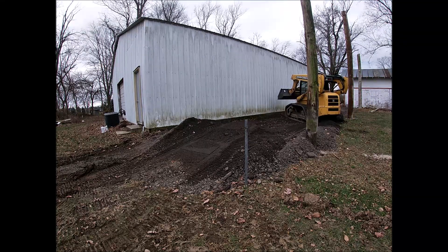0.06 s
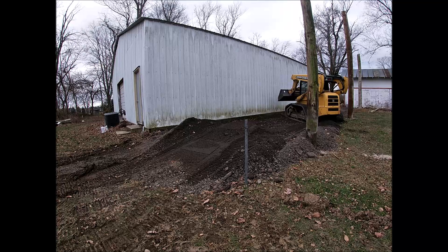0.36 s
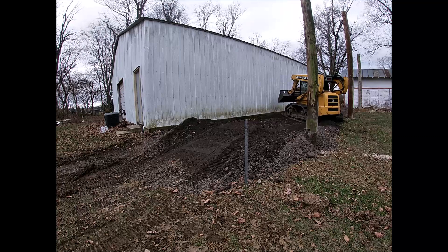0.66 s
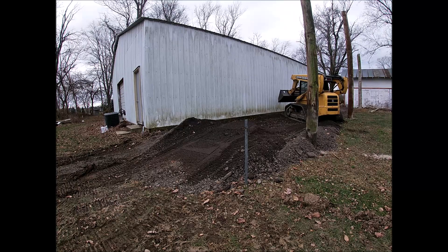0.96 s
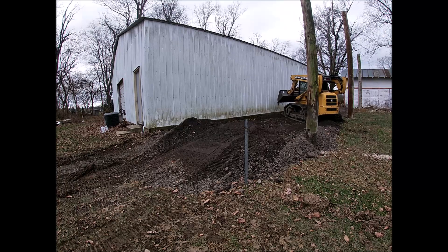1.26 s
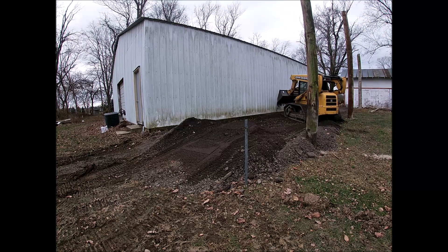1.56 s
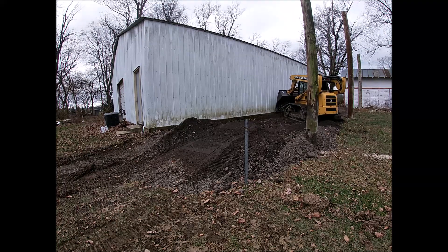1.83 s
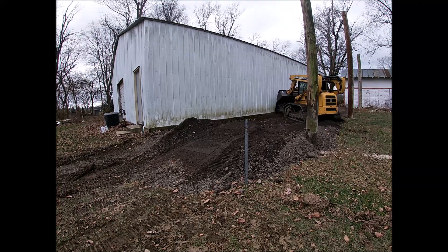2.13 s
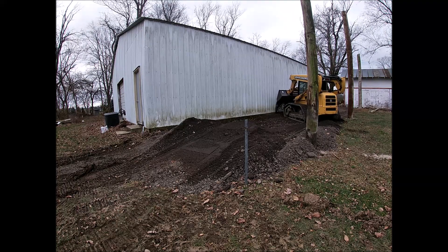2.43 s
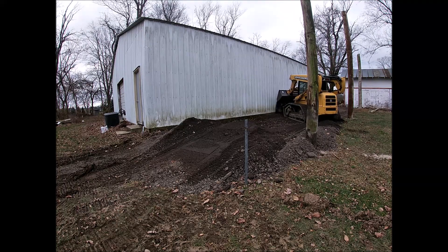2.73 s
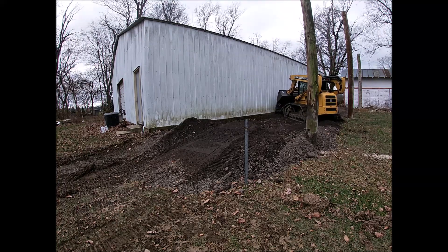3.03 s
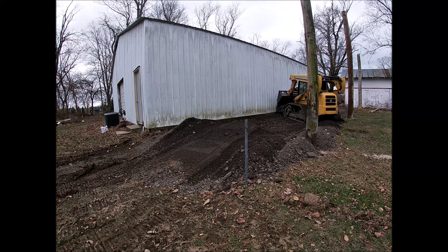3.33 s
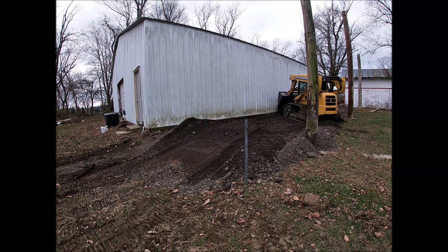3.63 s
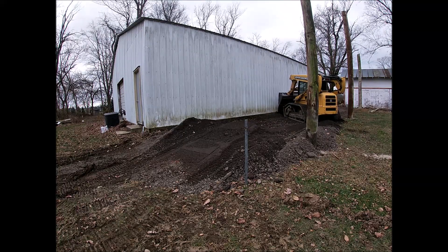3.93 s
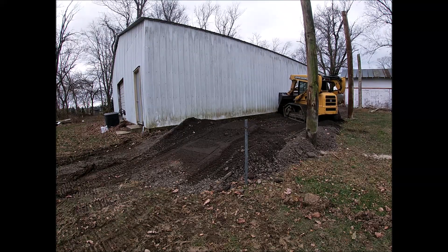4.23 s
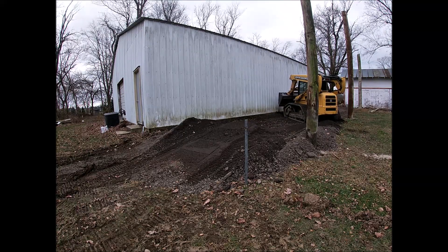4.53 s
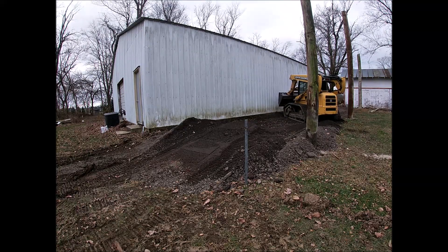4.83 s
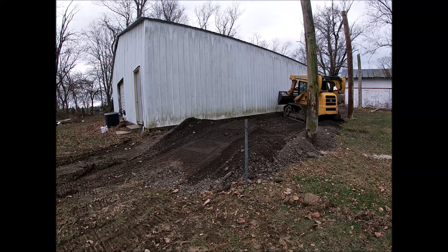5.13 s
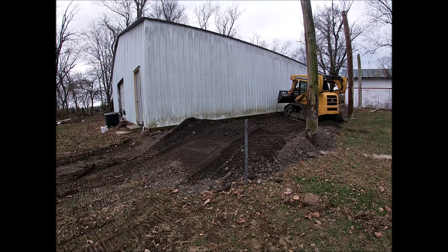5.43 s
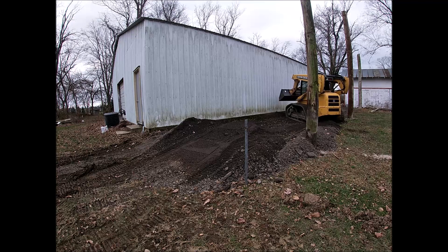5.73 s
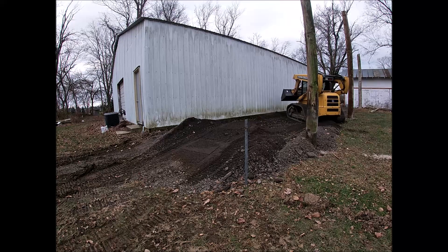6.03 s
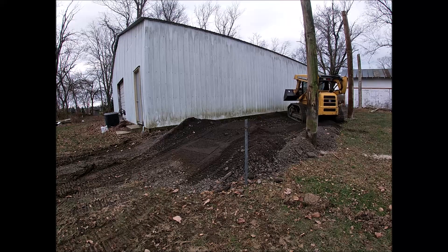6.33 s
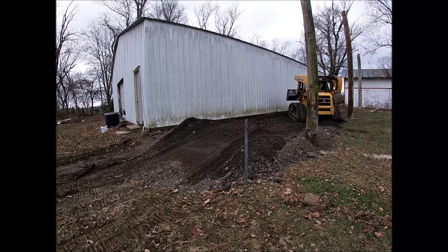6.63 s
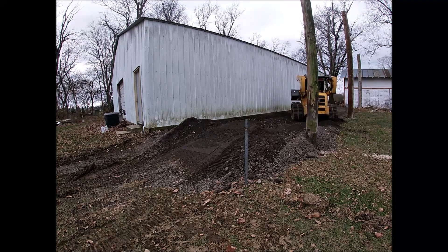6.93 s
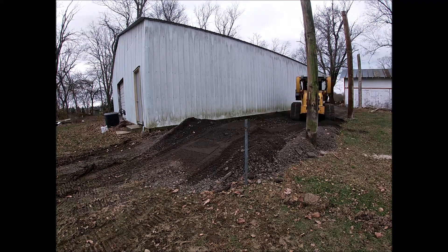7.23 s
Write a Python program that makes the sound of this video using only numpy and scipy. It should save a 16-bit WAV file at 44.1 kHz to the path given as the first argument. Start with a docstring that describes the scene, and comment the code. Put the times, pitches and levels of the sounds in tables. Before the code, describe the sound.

A tracked skid steer works outdoors some way off, its diesel engine droning throughout with fast knocking, metallic clatter and a rush of fan air. Beneath it the tracks grind over grit, while faint valve whistles come and go. Just after 1 second the engine dips briefly as the hydraulic pump whines. At about 1.7 seconds the bucket drops with one dull, short clunk. Softer whines and a faint crunch of small stones follow around 2 to 3 seconds. Wind rumbles and thumps on the microphone from about 1 second, strongest between 3 and 5.5 seconds, with another short gust near 7 seconds. From about 5 seconds the engine sags slightly in pitch and turns rougher, recovers briefly at 6 seconds, then sags again. The hydraulic whine and track grinding peak between 6 and 6.5 seconds, and the engine is still labouring at the end, around 7.4 seconds.

```python
"""Skid steer working a pile of millings

Some way off, beside a metal barn, a four-cylinder diesel drones, knocks and clatters.
It sags when the hydraulic pump takes load and whines; valves whistle and drive motors moan.
The tracks grind through the grit, the bucket clunks down once, and wind buffets the microphone."""
import sys
import numpy as np
from scipy import signal
from scipy.fft import rfft, irfft, next_fast_len
from scipy.io import wavfile
from scipy.ndimage import uniform_filter1d, minimum_filter1d, map_coordinates

SR = 44100
rng = np.random.default_rng(int(sys.argv[2]) if len(sys.argv) > 2 else 0)


def wav_record(signal):
    """Record a signal, one row per channel, as 16-bit PCM in the file named by sys.argv[1]."""
    frames = np.transpose(np.atleast_2d(signal))
    bounded = np.clip(frames, -1, 1)
    # unit amplitude maps onto the largest positive 16-bit level
    quanta = np.round(bounded * 32767).astype(np.int16)
    wavfile.write(sys.argv[1], SR, quanta)


N = 325458
TIME = np.arange(N) / SR

# Engine speed. Each row: time in seconds, firings per second.
FIRING_RATE = [(0.0, 60.57), (0.93, 60.93), (1.21, 59.36), (1.58, 61.44), (1.93, 60.23), (2.53, 61.46),
               (2.94, 60.9), (3.69, 60.8), (4.61, 61.3), (5.0, 60.8), (5.15, 58.45), (5.31, 58.82),
               (5.61, 56.84), (6.06, 60.03), (6.39, 56.94), (6.74, 56.11), (7.04, 57.05), (7.38, 56.68)]
# The engine bay as the machine turns and tilts. Each row: time in seconds, clatter in dB, air in dB.
ENGINE_BAY = [(0, -44.5, -46.5), (1.2, -42, -47), (1.85, -45, -48), (2.25, -40, -46), (3.5, -39.5, -46.5),
              (4.1, -39, -44.5), (4.7, -46, -47), (5.2, -39.5, -43.5), (5.85, -40, -45), (6.15, -44.5, -45),
              (6.75, -48.5, -49), (7.2, -42, -53)]


def amp(db):
    """Decibels to gain."""
    return 10 ** (np.asarray(db) / 20)


def unit(x):
    """Scales to rms 1."""
    return x / np.sqrt(np.mean(x ** 2) + 1e-20)


def curve(table, column):
    """One column of a timed table at every sample."""
    rows = np.array(table, float)
    return np.interp(TIME, rows[:, 0], rows[:, column])


def bump(s, rise_s, fall_s):
    """Gain that rises smoothly to 1 at time s and falls again."""
    width_s = np.where(TIME < s, rise_s, fall_s)
    return np.exp(-np.minimum(((TIME - s) / width_s) ** 2, 20))


def swells(table, rest_db):
    """Gain of events that rise and fall over a resting level."""
    power = sum((amp(db) * bump(s, rise_s, fall_s)) ** 2 for s, db, rise_s, fall_s in table)
    return np.sqrt(amp(rest_db) ** 2 + power)


def colour(x, spectrum):
    """Shapes x with an EQ curve; the result has rms 1."""
    hz, db = np.transpose(spectrum)
    size = next_fast_len(len(x))
    bins = np.fft.rfftfreq(size, 1 / SR)
    gain = amp(np.interp(np.log(bins + 1), np.log(hz), db))
    return unit(irfft(rfft(x, size) * gain, size)[:len(x)])


def drift(rate):
    """Smooth random motion of rms 1 that changes about rate times a second."""
    knots = rng.standard_normal(4096)
    return unit(map_coordinates(knots, [TIME * rate], order=2, mode="wrap"))


def tone(turns, flutter_db, wander):
    """A sine of rms 1 that flutters in level and wanders in phase."""
    return unit(amp(flutter_db * drift(18)) * np.sin(2 * np.pi * (turns + wander * drift(13))))


def narrow(hz, half_width_hz):
    """A narrow band of noise with rms 1."""
    lowpass = signal.butter(2, half_width_hz, fs=SR, output="sos")
    slow = signal.sosfilt(lowpass, rng.standard_normal((2, N)))
    phase = 2 * np.pi * np.cumsum(np.full(N, hz)) / SR
    return unit(slow[0] * np.cos(phase) + slow[1] * np.sin(phase))


def strokes(cycles, place, jitter_s, spread_db):
    """One click each time the crank passes a place in its cycle, a little uneven in time and force."""
    late, force = rng.standard_normal((2, 128))
    due_s = np.interp(np.arange(len(late)) + place, cycles, TIME, right=-1)
    at = (due_s + jitter_s * late) * SR
    inside = (at > 0) & (at < N - 1)
    return np.bincount(at[inside].astype(int), amp(spread_db * force[inside]), N)


def ring(clicks, response):
    """Lets every click sound the response."""
    return signal.oaconvolve(clicks, response)[:N]


def exhaust(cycles):
    """The firing tone, its octave lifted by the muffler, and the throb of unequal cylinders."""
    # The drone, weaker up on the pile. Each row: time in seconds, firing tone in dB, octave in dB.
    levels = [(0, -27.3, -22), (.85, -28.3, -21.7), (1.25, -32.5, -21), (1.65, -27, -22.5),
              (1.95, -41, -26), (2.2, -33.5, -25.5), (3.1, -34, -25), (3.6, -29.5, -25.3), (4.1, -35, -26),
              (4.85, -33, -27.5), (5.27, -39, -23.5), (5.47, -39, -27), (5.65, -31, -23.5),
              (6.05, -27.8, -20.5), (6.3, -31, -20.3), (6.85, -28.5, -20.5), (7.02, -41, -27),
              (7.2, -30, -21)]
    # The throb. Each row: multiple of the four-stroke cycle rate, level in dB.
    uneven = [(5, -59.5), (6, -39), (7, -42), (9, -52.5), (11, -50.5), (12, -69), (13, -57.5), (17, -72.5),
              (19, -71)]
    firings = 4 * cycles
    low = amp(curve(levels, 1)) * tone(firings, flutter_db=.6, wander=.012)
    octave = amp(curve(levels, 2)) * tone(2 * firings, flutter_db=.3, wander=.005)
    throb = sum(amp(db) * tone(k * cycles, flutter_db=6, wander=.032) for k, db in uneven)
    return low + octave + throb


def rattle(cycles, table, rough, tail_db, tail_s=.03):
    """Blows at set crank angles, part clean ring and part chatter; the metal rings on faintly."""
    t, out = np.arange(8192) / SR, np.zeros(N)
    for place, hz, rise_s, db in table:
        swell = (t / rise_s) ** 4 * np.exp(4 * (1 - t / rise_s))
        tail_onset = np.minimum(t / (2 * rise_s), 1) ** 2
        tail_decay = np.exp(-np.maximum(t - 2 * rise_s, 0) / tail_s)
        envelope = swell + amp(tail_db) * tail_onset * tail_decay
        clicks = strokes(cycles, place, jitter_s=.000035, spread_db=.9)
        clean = ring(clicks, envelope * np.sin(2 * np.pi * hz * t))
        chatter = rough * ring(clicks, envelope) * narrow(hz, half_width_hz=50) / np.sqrt(2)
        out += amp(db) * (clean + chatter)
    return unit(out)


def metalwork(cycles):
    """Injectors tick, panels knock, gears sing; as the engine sags, blows roughen and a panel buzzes."""
    # Ticks and knocks. Each row: place in the cycle from 0 to 1, ring in Hz, rise in seconds, relative dB.
    injector_blows = [(.418, 1576, .0056, 0), (.683, 1574, .005, -8), (.17, 1578, .005, -15),
                      (.45, 1830, .0065, -10), (.8, 1830, .0065, -12), (.01, 1410, .007, -9)]
    panel_blows = [(.64, 1037, .0062, 0), (.918, 1037, .0058, -9), (.182, 1037, .0055, -17),
                   (.145, 790, .007, -10.5), (.56, 1278, .008, -12), (.875, 1278, .007, -11)]
    # Their mix. Each row: time in seconds, knocks in dB, ticks in dB, gear whine in dB.
    levels = [(0, -46.3, -48, -64), (1.2, -44.8, -48.5, -64), (1.7, -46.3, -51, -62),
              (2.6, -43.2, -48.8, -56), (4, -43, -48.3, -56), (4.7, -49.5, -60, -51),
              (5.22, -42.7, -46.3, -64), (5.85, -43, -49.5, -64), (6.2, -46.5, -52, -70),
              (6.7, -46, -59, -70), (7.15, -43.3, -61, -70)]
    firing_hz = curve(FIRING_RATE, 1)
    sag = np.maximum(1 - firing_hz / np.median(firing_hz), 0)
    labouring = cycles + .07 * sag * drift(24)  # the timing loosens under load
    ticks = rattle(labouring, injector_blows, rough=.24 + 1.5 * sag, tail_db=-22)
    knocks = rattle(labouring, panel_blows, rough=.26 + 1.5 * sag, tail_db=-16)
    shaking = 1 + .5 * np.cos(8 * np.pi * cycles)  # once per firing
    buzz = 12 * sag * shaking * narrow(1028, half_width_hz=34)
    gear_order, first_knock = 68, panel_blows[0][0]
    gears = tone(gear_order * (cycles - first_knock), flutter_db=2.5, wander=.06)
    knock_gain, tick_gain, gear_gain = (amp(curve(levels, column)) for column in (1, 2, 3))
    return knock_gain * (knocks + buzz) + tick_gain * ticks + gear_gain * gears


def clatter(cycles):
    """Each cylinder shakes the block in its own way; the pattern shifts as the machine moves."""
    # Ring of the block and panels. Each row: frequency in Hz, relative level in dB.
    block_eq = [(150, -21.5), (420, -11.5), (600, -7), (740, 2), (830, 4.5), (920, -5), (1050, -1),
                (1170, -6), (1280, 0), (1450, -1.5), (1560, -6), (1700, -15), (1880, -4.5), (2060, -18),
                (2750, -10.5), (3300, -14.5), (4000, -23.5), (7000, -51.5)]
    t, out = np.arange(2600) / SR, np.zeros(N)
    envelope = np.exp(-t / .027) * (1 - np.exp(-t / .0045))
    for place in np.arange(4) / 4:
        blows = strokes(cycles, place + .16, jitter_s=.00004, spread_db=1.2)
        aspect = .5 * drift(.897)
        for share in (np.cos(aspect), np.sin(aspect)):  # a slow blend of two noise bursts
            out += share * ring(blows, rng.standard_normal(len(t)) * envelope)
    return amp(curve(ENGINE_BAY, 1)) * colour(out, block_eq)


def rushing_air(cycles):
    """Air rushes through the fan and grille, pulsing twice for each firing."""
    # Colour of the rush. Each row: frequency in Hz, relative level in dB.
    air_eq = [(150, -2), (330, 1.5), (700, -2), (1180, 2.5), (1500, 5.5), (2100, 2.5), (2700, 7),
              (3250, 3.5), (3700, 0.5), (4400, -0.5), (5600, -0.5), (6100, -11.5), (6600, -18), (7800, -29),
              (14000, -49)]
    beats = 8 * cycles
    pulsing = 1 + .11 * np.cos(2 * np.pi * beats) + .11 * np.cos(np.pi * beats)
    gain = amp(curve(ENGINE_BAY, 2) + .5 * drift(25))
    return gain * colour(rng.standard_normal(N) * pulsing, air_eq)


def fan_and_alternator(cycles):
    """Fan blades and alternator hum in step with the crank; the fan throbs once in every cycle."""
    # The two hums. Each row: time in seconds, level in dB.
    fan_levels = [(0, -40.5), (.97, -40), (1.12, -50), (1.45, -43.5), (1.8, -46.5), (4.6, -46.5),
                  (5.5, -50.5), (6.03, -46.5), (6.15, -42.5), (6.75, -41), (7.2, -58.5)]
    alternator_levels = [(0, -59.5), (.8, -52.5), (2, -59.5), (3.7, -51.5), (4.8, -62), (5.03, -49.5),
                         (5.27, -57.5), (5.55, -46.5), (6.03, -50.5), (6.5, -64.5)]
    fan_order, alternator_order = 16.72, 26  # vibrations per engine cycle
    throb = 1 + .4 * np.cos(2 * np.pi * cycles)
    fan = throb * tone(fan_order * cycles, flutter_db=1, wander=.012)
    alternator = tone(alternator_order * cycles, flutter_db=3, wander=.039)
    return amp(curve(fan_levels, 1)) * fan + amp(curve(alternator_levels, 1)) * alternator


def hydraulics(cycles):
    """Nine pump pistons whine, oil whistles in the valves, and the drive motors moan as they push."""
    # Pump and motor swells. Each row: peak time in seconds, level in dB, rise and fall in seconds.
    pump_loads = [(1.15, -42, .17, 0.19), (2.25, -46, 0.17, 0.098), (2.52, -49, 0.13, 0.11),
                  (5.51, -40.5, 0.068, 0.08), (5.97, -42, 0.13, 0.1), (6.2, -34.7, 0.13, 0.16),
                  (6.5, -38.3, 0.18, 0.22), (6.9, -45, 0.14, 0.17)]
    motor_pushes = [(.55, -47.5, 0.51, 0.66), (5.7, -45, 0.12, 0.14), (6.5, -52.5, .2, 0.62)]
    # Valve openings. Each row: peak time in seconds, level in dB, rise and fall in seconds, pitch in Hz.
    openings = [(.25, -57, .3, .5, 2780), (1.13, -55, .16, .18, 3040), (2.75, -58, .3, .3, 2760),
                (3.7, -58.5, .5, .55, 3195), (3.9, -58, .45, .35, 2625), (5.13, -55, .2, .18, 2720),
                (5.61, -50.5, .09, .11, 3090), (5.88, -50.5, .1, .14, 3150), (6.23, -56, .1, .1, 2500),
                (6.4, -53.5, .09, .1, 2980), (6.48, -55, .1, .15, 3230), (6.62, -50, .09, .2, 3085),
                (7.15, -53.5, .2, .25, 3095)]
    pistons = 18 * cycles  # two turns of the pump per engine cycle
    harmonics_db = [-10, 0, -19, -15]
    whine = sum(amp(db) * tone(k * pistons, flutter_db=.8, wander=.012)
                for k, db in enumerate(harmonics_db, 1))
    whistle = sum(amp(db) * bump(s, rise_s, fall_s) * narrow(hz, half_width_hz=55)
                  for s, db, rise_s, fall_s, hz in openings)
    moan = swells(motor_pushes, rest_db=-58) * narrow(489, half_width_hz=17)
    return swells(pump_loads, rest_db=-61) * whine + whistle + moan


def tracks():
    """Tracks grind lumpily over the pile; small stones crunch under them in clumps."""
    # Effort of the tracks. Each row: time in seconds, grinding level in dB.
    effort = [(0, -41), (.45, -42), (1.15, -42), (1.6, -43), (1.95, -51), (2.7, -42.5), (3.6, -49.5),
              (4.15, -47), (4.75, -53), (5.7, -41), (6.4, -37.5), (7.38, -41.5)]
    # Bites into loose stones. Each row: peak time in seconds, level in dB, rise and fall in seconds.
    crunches = [(1.35, -67, .35, 0.38), (2.4, -56.5, 0.45, 1.5), (5.6, -58, 0.16, 0.49),
                (6.4, -60, 0.22, 1.4)]
    # Dark grind and bright grit. Each row: frequency in Hz, relative level in dB.
    grind_eq = [(100, -4.5), (260, 1), (370, -8.5), (480, 2), (580, 1), (760, 0.5), (950, -4), (1300, -8),
                (2200, -16), (6000, -58.5)]
    grit_eq = [(800, -12.5), (2500, 14.5), (5600, 25), (6600, 12), (8000, 0.5), (10500, 1), (11300, -6),
               (12500, -9), (14000, -24.5)]
    grind = colour(rng.standard_normal(N) * amp(1.2 * drift(45)), grind_eq)
    cracks = rng.random(N) < 3000 / SR  # about 3000 a second
    force = amp(3.3 * np.minimum(rng.exponential(1, N), 4))
    grit = colour(cracks * force * rng.standard_normal(N) * amp(1.5 * drift(22)), grit_eq)
    return amp(curve(effort, 1)) * grind + swells(crunches, rest_db=-77) * grit


def wind():
    """Lumpy low rumble; the strongest eddies thump and flutter at the microphone."""
    # Gusts. Each row: peak time in seconds, level in dB, rise and fall in seconds.
    gusts = [(1.1, -35.5, 0.097, .15), (1.7, -33, .12, 0.49), (2.38, -33, 0.98, 0.15),
             (3.1, -29.5, 0.36, 1), (4.12, -25, 0.34, 0.25), (4.6, -28.5, 0.51, 0.39),
             (5.38, -26.5, 0.19, 0.2), (6.35, -44.5, 0.36, .15), (6.9, -26, 0.055, 0.11)]
    # Single buffets. Each row: peak time in seconds, thump in dB, length in seconds, flutter in dB.
    buffets = [(1.156, -35, .068, -50), (1.737, -29, .037, -46), (2.079, -28, .021, -52),
               (2.282, -32.5, .087, -47), (2.722, -33, .02, -44), (2.935, -27, .02, -41),
               (2.995, -28.5, .04, -38.5), (3.045, -28.5, .035, -41), (3.85, -30.5, .1, -42),
               (3.972, -27.5, .035, -40), (4.048, -24.5, .03, -38.5), (4.1, -23.5, .026, -35),
               (4.302, -28, .03, -42), (4.372, -29, .06, -43.5), (4.475, -29, .11, -46),
               (4.568, -26, .055, -42), (4.635, -26, .04, -42), (4.685, -33, .025, -46),
               (5.335, -30, .025, -44), (5.377, -28, .03, -42), (6.297, -30, .042, -44),
               (6.892, -34.5, .13, -46)]
    # Wind colours, darkest first. Each row: frequency in Hz, relative level in dB.
    rumble_eq = [(8, -12.5), (25, 5.5), (50, 6.5), (85, 5.5), (120, 2), (160, -6), (220, -16), (330, -22.5),
                 (600, -45), (1500, -73.5)]
    thump_eq = [(15, -17.5), (50, 5), (130, 3), (200, -4), (300, -9), (450, -27.5), (750, -37),
                (1500, -49.5), (4000, -86.5)]
    flutter_eq = [(80, -22), (200, -1), (300, 0), (450, -6.5), (650, -13), (1000, -22), (2500, -45),
                  (6000, -75)]
    rumble = colour(rng.standard_normal(N) * amp(drift(22)), rumble_eq)
    thump_gain = sum(amp(db) * bump(s, length / 2, length / 2) for s, db, length, _ in buffets)
    flutter_gain = sum(amp(db) * bump(s, length / 2, length / 2) for s, _, length, db in buffets)
    thumps = thump_gain * colour(rng.standard_normal(N), thump_eq)
    flutters = flutter_gain * colour(rng.standard_normal(N), flutter_eq)
    return swells(gusts, rest_db=-35.5) * rumble + thumps + flutters


def bucket(start_s, db, decay_s):
    """The bucket drops on the pile with one dull, quickly damped clunk."""
    # Its dull body. Each row: frequency in Hz, relative level in dB.
    body_eq = [(100, -20), (280, -2), (450, -4), (720, 0), (900, -6), (1300, -17), (3000, -45), (9000, -90)]
    age = np.maximum(TIME - start_s, 0)
    envelope = (1 - np.exp(-age / .0038)) * np.exp(-age / decay_s)
    return amp(db) * envelope * colour(rng.standard_normal(N), body_eq)


def scene():
    """One crank paces the engine and pump, four firings to a cycle; ground and wind join in mono."""
    cycles = np.cumsum(curve(FIRING_RATE, 1)) / SR / 4
    engine = exhaust(cycles) + metalwork(cycles) + clatter(cycles)
    machine = engine + rushing_air(cycles) + fan_and_alternator(cycles) + hydraulics(cycles)
    ground = tracks() + bucket(start_s=1.725, db=-29.5, decay_s=.016)
    return (machine + ground + wind())[None]


def record(dry):
    """A limiter ducks smoothly around the peaks, then a low-pass trims the top."""
    ceiling_db, window_samples, cutoff_hz = -12.3, 700, 13800
    room = np.minimum(amp(ceiling_db) / (abs(dry) + 1e-9), 1)
    gain = uniform_filter1d(minimum_filter1d(room, window_samples), window_samples)
    lowpass = signal.firwin(511, cutoff_hz, window=("kaiser", 9), fs=SR)
    return signal.oaconvolve(dry * gain, lowpass[None], "same")


dry = scene()
out = record(dry)
wav_record(out)
```